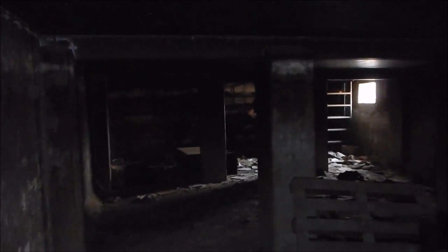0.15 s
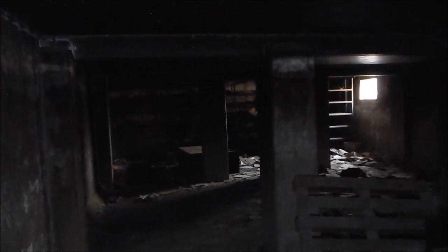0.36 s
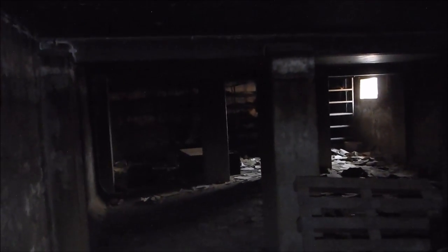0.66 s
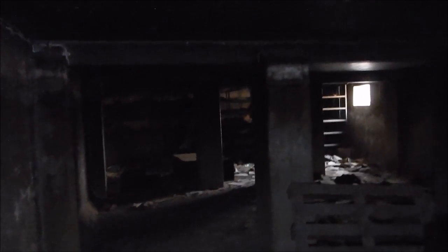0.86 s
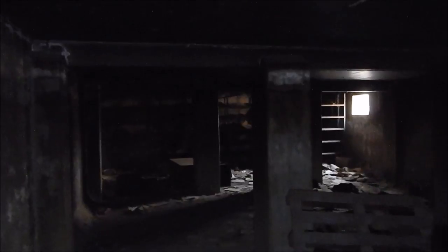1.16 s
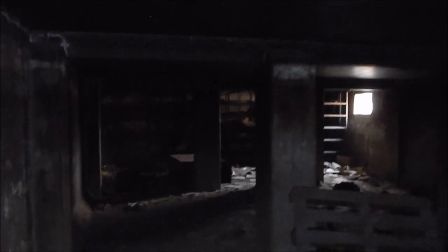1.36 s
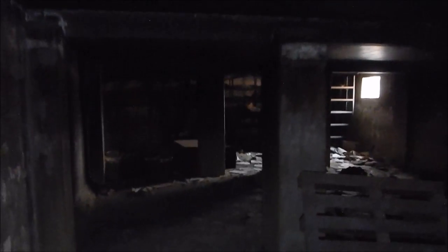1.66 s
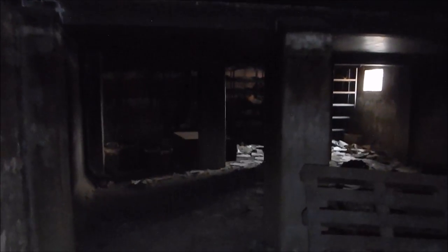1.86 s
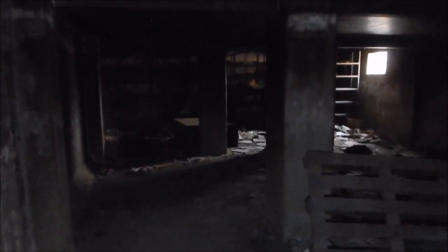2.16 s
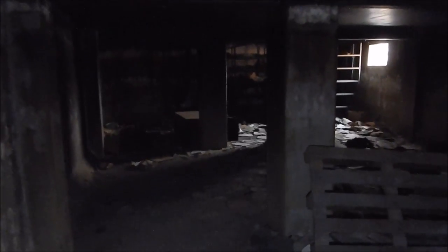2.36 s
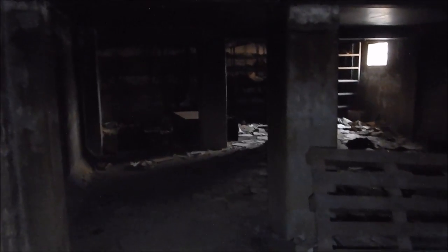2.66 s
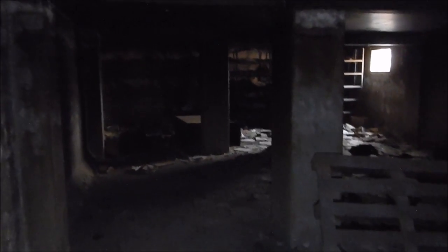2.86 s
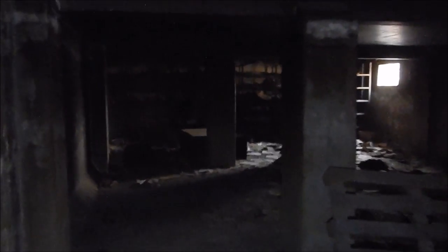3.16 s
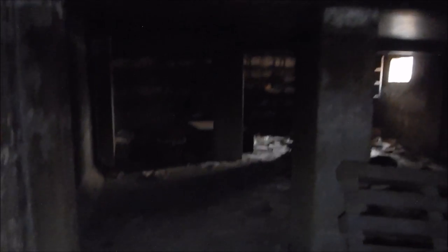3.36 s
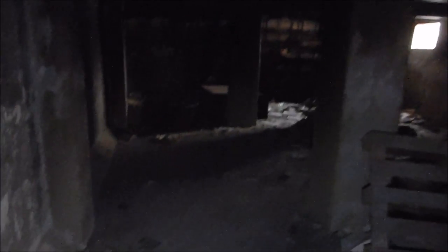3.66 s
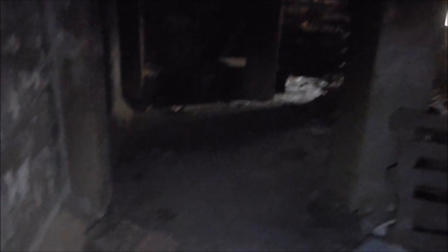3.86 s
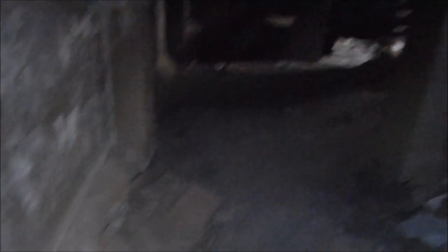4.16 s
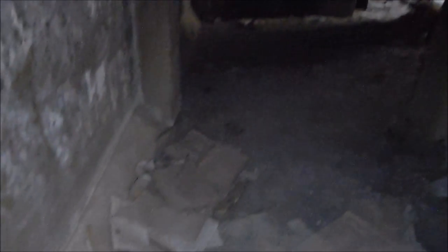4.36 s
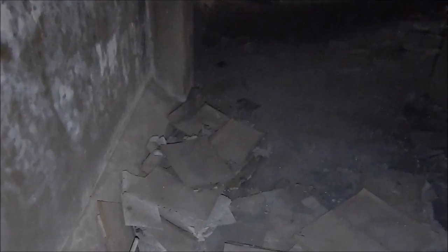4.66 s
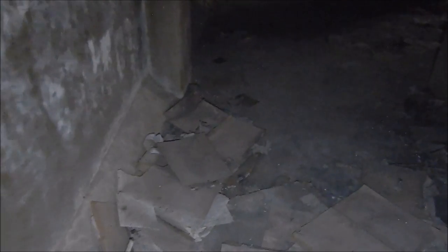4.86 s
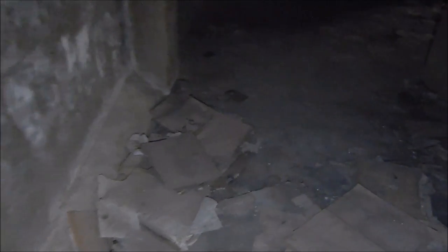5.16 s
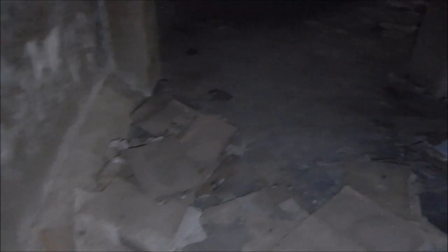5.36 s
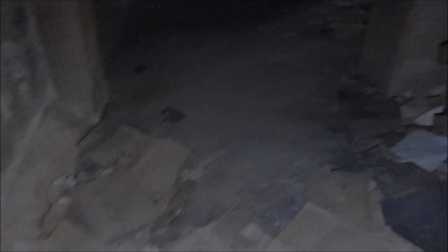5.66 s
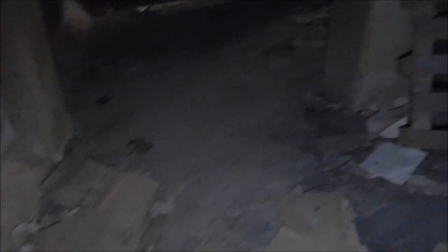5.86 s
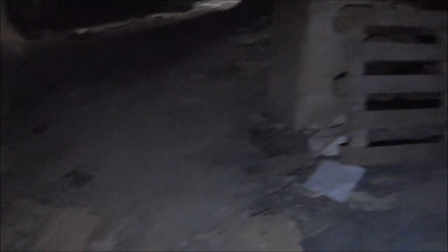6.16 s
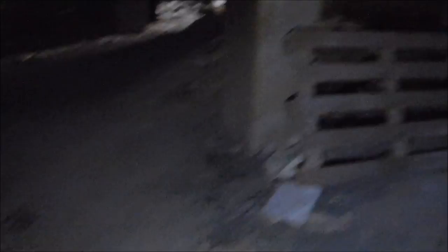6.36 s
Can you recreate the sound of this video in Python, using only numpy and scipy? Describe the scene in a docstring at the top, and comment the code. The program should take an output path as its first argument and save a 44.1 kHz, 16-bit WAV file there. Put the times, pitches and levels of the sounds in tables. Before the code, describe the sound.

In an empty concrete building, close to a hand-held microphone, a loose board slaps the floor loudly, a second hard clack follows a second later with dense crunching of rubble. The shuffling then thins to faint grit and ticks. Around four seconds a piece of metal chatters briefly on concrete; after a quiet stretch, a dull step thuds on boards. Short hard-walled reverberation and faint hiss surround everything.

```python
"""Slow steps over rubble and loose boards in an empty concrete building, close to a hand-held camera.
Soles crush random grains that excite hollow floor, stones and grit; trodden boards and shards resonate.
Dense grain clusters make sharp knocks and ticks, decaying sines a slapped board and clinking metal.
The bare rooms answer with a decaying noise tail of about 0.7 s, longer in the bass, over faint hiss."""
import sys
import numpy as np
from scipy import signal
from scipy.fft import rfft, irfft
from scipy.io import wavfile

SR = 44100
rng = np.random.default_rng(int(sys.argv[2]) if len(sys.argv) > 2 else 0)


def bounce(signal):
    """Save signal as a 16-bit WAV file at the path given by the first command-line argument."""
    frames = np.transpose(np.atleast_2d(signal))
    limited = np.clip(frames, -1, 1)
    pcm = np.round(limited * 32767).astype(np.int16)
    wavfile.write(sys.argv[1], SR, pcm)


N = 286650
TIME = np.arange(N) / SR


def steps():
    """A sole crushes many grains as it settles; the duller the step, the more weight it carries."""
    # soles and heels settling: peak_s, relative level_db, brightness_db, decay_s
    settlings = [(0.421, -29, -5.5, 0.087), (0.689, -34, 0.5, 0.01), (1.094, -36.5, -5.5, 0.058),
                 (1.474, -23, -14, 0.0055), (1.546, -29.5, -4, 0.021), (1.703, -32, -16, 0.014),
                 (2.872, -50.5, -21, 0.0047), (4.937, -44.5, -0.5, 0.02), (5.733, -32, -14, 0.0088),
                 (5.761, -32, -25, 0.0053)]
    rise_s = 0.0053
    rows = []
    for s, db, bright_db, decay in settlings:
        bass_db = -2 - 0.37 * bright_db
        rows.append((s, db, bass_db, bright_db, rise_s, decay))
    return amp(3) * blows(rows, grains(2200, 4.1))


def crunch():
    """Grains keep breaking as the weight shifts, most in the middle of each shuffle."""
    # soles grinding over rubble: peak_s, level_db, bass_db, treble_db, half_length_s
    shuffles = [(.09, -49, -0.5, -11, 0.054), (0.74, -48.5, -3, 1, 0.058), (0.936, -47, -5, -7, 0.058),
                (1.352, -25, -7, -1.5, 0.028), (1.475, -30.5, 4, -5.5, 0.051), (1.616, -31, -6, 0, 0.037),
                (1.707, -29.5, 1.5, -8.5, 0.033), (1.878, -32.5, 1, -7, 0.04), (2.034, -45.5, 1, -5, .11),
                (2.337, -40.5, 2, -1, 0.028), (2.516, -39.5, -11.5, -0.5, 0.045),
                (2.738, -44, -9, -0.5, 0.037), (2.98, -48, -5, -6.5, 0.072), (3.182, -43, -11, -2.5, 0.044),
                (3.319, -46, -6, -14, 0.038), (3.585, -53, -5, -11, 0.084),
                (3.814, -40.5, -6.5, -16, 0.032), (3.982, -35, -8, -4, 0.073),
                (5.24, -38, -4.5, -1.5, 0.012), (5.543, -50, -9, 2.5, 0.076),
                (5.714, -36, -2.5, -1.5, 0.041), (5.993, -50.5, -20, 5, 0.048)]
    # rubble creeping under the standing weight: boards_db, stones_db, grit_db
    creep_db = (-72.5, -64.5, -58)
    swell_shape = 1.38  # 1 = a pointed swell, 2 = a bell
    slip_s, slip_db = .012, 3  # the sole sticks and slips, so the crunch comes in lumps
    power = amp(creep_db)[:, None] ** 2 * np.ones(N)
    for s, db, bass_db, treble_db, half in shuffles:
        distance = abs((TIME - s) / half)
        swell = amp(db) * np.exp(-np.minimum(distance ** swell_shape / 2, 20))
        power += (shares(bass_db, treble_db)[:, None] * swell) ** 2
    weight, stones, grit = np.sqrt(power)

    slips = np.arange(0, N / SR + slip_s, slip_s)
    lumps = evened(level(slips, slip_db * rng.standard_normal(len(slips))))
    coarse = lumps * grains(2500, 3.45)
    fine = lumps * grains(7000, 2.35)
    return rubble(weight * coarse, stones * coarse, grit * evened(fine + 0.67 * coarse))


def thumps():
    """A soft tread booms in the boards' low resonances, a hard one clacks in the higher ones."""
    # resonances of the loose floorboards: pitch_hz, width_hz, relative level_db
    floorboards = [(201, 49.5, 1), (272, 72, -6), (371, 61, -2.5), (657, 143, -6), (1270, 130, -1.5),
                   (1800, 1000, 5)]
    # feet loading those boards: start_s, relative level_db, hardest-driven pitch_hz, decay_s
    treads = [(0.413, -20, 540, 0.0072), (0.428, -26.5, 230, 0.012), (.687, -38.5, 380, 0.0087),
              (0.915, -29, 448, 0.0066), (1.108, -30.5, 480, 0.019), (1.365, -33, 200, 0.025),
              (1.438, -13.5, 750, 0.0081), (1.544, -18, 400, 0.0096), (1.705, -24, 367, 0.034),
              (2.32, -49, 380, 0.043), (3.238, -36, 1800, 0.0059), (5.125, -40.5, 170, 0.021),
              (5.707, -21, 650, 0.0093), (5.711, -24.5, 190, 0.015), (5.76, -31, 546, 0.023),
              (5.872, -41, 170, 0.0073)]
    drive_octaves = 0.69  # how far to either side of that pitch a blow reaches
    source, out = grains(6000, 3.5), np.zeros((2, N))
    for s, db, drive_hz, decay in treads:
        for hz, width, mode_db in floorboards:
            start, ring = note(source, s, hz, width, decay)
            drive = np.exp(-(np.log2(hz / drive_hz) / drive_octaves) ** 2)
            add(out, start, amp(db + mode_db) * drive * ring)
    return amp(0.5) * ports(out)


def shards():
    """Each trodden shard grates briefly at its own pitch; longer notes are purer."""
    # shards underfoot: start_s, relative level_db, pitch_hz, decay_s
    trodden = [(.37, -30, 5700, 0.0064), (0.409, -13.5, 4550, 0.0044), (.412, -29, 8500, .03),
               (1.099, -30, 3390, 0.024), (1.437, -12.5, 3060, 0.0093), (1.556, -29.5, 3490, 0.049),
               (1.629, -24.5, 6040, 0.007), (5.236, -34.5, 910, 0.013), (5.503, -27, 6200, .0018),
               (5.603, -25.5, 6170, 0.0022)]
    source, out = grains(6000, 3.5), np.zeros((2, N))
    for s, db, hz, decay in trodden:
        relative_width = min(0.16 * (0.015 / decay) ** 0.47, 1)  # 0.16 of the pitch at 15 ms decay
        start, ring = note(source, s, hz, hz * relative_width, decay)
        add(out, start, amp(db) * ring)
    return amp(-5.5) * ports(out)


def knocks():
    """Hard contacts are dense grain clusters; the sole cushions the start of the longer ones."""
    # boards and stones, before the lag: start_s, relative level_db, bass_db, treble_db, decay_s
    contacts = [(0.407, -4, -4.5, -3, 0.0027), (.912, -21.5, -18.5, -12.5, 0.0048),
                (1.434, -15.5, -35, -16.5, 0.011), (1.697, -34, -13, -11, 0.0074),
                (3.096, -31.5, -4.5, -7, 0.0081), (3.239, -31, 4, -13, 0.015),
                (5.697, -26.5, -12, -29, 0.016)]
    hard_rise_s, soft_rise_s, lag_s = 0.00021, 0.002, 0.005
    rows = []
    for s, db, bass_db, treble_db, decay in contacts:
        rise = np.interp(decay, [.006, .012], [hard_rise_s, soft_rise_s])
        rows.append((s + lag_s, db, bass_db, treble_db, rise, decay))
    return amp(-2.5) * blows(rows, grains(12000, 3.5))


def ticks():
    """Small stones break in a few milliseconds."""
    # stones snapping, before the lag: start_s, relative level_db, brightness_db
    snaps = [(.303, -33, -9), (.795, -32, 0), (1, -33, 1), (1.06, -29.5, -2), (2.006, -31, 4),
             (2.27, -32, -23), (3.045, -27.5, 1), (3.185, -33, -3), (3.476, -32, -19), (3.612, -28, -1),
             (3.665, -27, -1), (3.849, -30, -16), (3.882, -28.5, -20), (4.813, -34, -2), (4.831, -30.5, -5),
             (5.041, -32.5, -7.5)]
    rise_s, decay_s, lag_s, bass_db = 0.00036, 0.0061, 0.0026, -10
    rows = [(s + lag_s, db, bass_db, bright_db, rise_s, decay_s) for s, db, bright_db in snaps]
    return amp(-7.5) * blows(rows, grains(12000, 1.7))


def board():
    """A loose board slaps the floor; it and the debris on it ring as decaying sines."""
    # the slapped board and its debris: pitch_hz, level_db, t60_s
    board_modes = [(82.5, -27.5, 0.65), (389, -19, 0.025), (478, -10.5, 0.03), (660, -6, 0.026),
                   (1202, -3, 0.02), (1400, -7, 0.0091), (2108, -26.5, .18), (5216, -22.5, 0.15),
                   (5545, -30, 0.2)]
    t = np.maximum(TIME - .4083, 0)  # seconds since the slap
    ring = np.zeros(N)
    for k, (hz, db, t60) in enumerate(board_modes):
        sign = (-1) ** k
        ring += sign * amp(db - 60 * np.minimum(t / t60, 3)) * np.sin(2 * np.pi * hz * t)
    return np.array([ring, ring])


def clink():
    """Metal chatters over concrete; every contact renews its short ring."""
    # the piece of metal, damped by the floor: pitch_hz, relative level_db
    metal_modes = [(1610, -24), (1750, -22), (1957, -14), (2058, -2), (2090, -9), (2342, -6), (2763, -5),
                   (2836, -1), (3060, -18), (3250, -13), (4400, -17), (4877, -17), (5080, -13), (5168, -14),
                   (5290, -18), (5541, -12), (5604, -14), (5652, -12), (5812, -14), (5899, -13),
                   (6110, -20), (6175, -21)]
    # its rattle: time_s, force_db, shift_db from the low to the high modes
    rattle = [(3.944, -37, -4), (3.958, -19, -16), (3.97, 1, -5), (3.986, 0.5, -4), (3.999, -6, 7.5),
              (4.012, -7, 0), (4.024, -42, -8), (4.06, -9, 1), (4.075, -35, -7)]
    # colour of the scrape: frequency_hz, density_db per Hz
    scrape_colour = [(30, -36), (120, -14), (200, 10.5), (700, -22), (1400, -12), (2200, 13), (3000, 3),
                     (3800, -14), (4500, 17.5), (5800, 16), (6500, 8), (8300, 4), (10500, -12),
                     (16000, -17)]
    t60_s, onset_s = 0.14, 0.00033
    times, force_db, shift_db = np.transpose(rattle)
    chatter = grains(4000, 3) * level(times, force_db)
    first, t = round(times[0] * SR), TIME[:SR // 2]
    contacts = chatter[:, first:first + len(t)]
    shift = np.interp(times[0] + t, times, shift_db)
    ring = np.zeros((2, N))
    for hz, db in metal_modes:
        mode = amp(-60 * t / t60_s) * (1 - np.exp(-t / onset_s)) * np.sin(2 * np.pi * hz * t)
        tilt = np.clip(3 * np.log2(hz / 2500), -1, 1)  # -1 for low modes, 1 for high ones
        voice = signal.fftconvolve(contacts * amp(shift * tilt), mode[None], axes=1)
        size = amp(db) * np.linalg.norm(contacts[0])
        add(ring, times[0], size * voice / np.linalg.norm(voice, axis=1, keepdims=True))
    pan = amp([[-0.75], [0.75]])  # slightly to the second microphone
    scrape = ports(colour(chatter, scrape_colour))
    return amp(-14) * ports(ring) * pan + amp(-18.5) * scrape


def room(x):
    """Near walls answer quickly; the halls beyond hold a longer tail."""
    # the longer tail: frequency_hz, t60_s
    hall_t60 = [(80, 4), (200, 0.93), (600, 0.69), (2000, 0.7), (5500, 0.73), (8500, 0.65), (14000, 0.4)]
    near_db, near_t60_s, build_s = 5, 0.28, 0.012
    hz, t, z = signal.stft(rng.standard_normal((2, SR * 3 // 2)), SR, nperseg=256)
    halls = amp(-60 * t / read(hall_t60, hz)[:, None])
    walls = 1 + amp(near_db - 60 * t / near_t60_s)
    build_up = 1 - np.exp(-(t / build_s) ** 2)
    tail = ports(signal.istft(z * halls * walls * build_up, SR, nperseg=256)[1])
    return signal.fftconvolve(x, tail / np.linalg.norm(tail[0]), axes=1)[:, :N]


def hiss():
    """Still air and the microphones' own noise: steady coloured noise."""
    # colour of the noise: frequency_hz, density_db per Hz
    hiss_colour = [(20, -17), (48, 1.5), (85, 4), (130, -7.5), (220, -2), (450, -9.5), (800, -10.5),
                   (1900, -10.5), (2700, -12.5), (3200, -10.5), (4000, -17.5), (5800, -11), (6600, -15),
                   (8300, -19), (10000, -28.5), (15500, -28.5)]
    # its difference between the microphones: frequency_hz, side_db against mid
    hiss_width = [(60, -9.5), (130, -5.5), (290, -4.5), (640, -4), (1410, -3.5), (3100, -1), (6820, 1),
                  (15000, 0.5)]
    return amp(-53) * ports(colour(rng.standard_normal((2, N)), hiss_colour), hiss_width)


def blows(rows, source):
    """Each blow shares its energy between floor, stones and grit."""
    forces = np.zeros((3, 2, N))
    for s, db, bass_db, treble_db, rise, decay in rows:
        start, cluster = burst(source, s, rise, decay)
        add(forces, start, amp(db) * shares(bass_db, treble_db)[:, None, None] * cluster)
    return rubble(*forces)


def shares(bass_db, treble_db):
    """How a force divides between floor, stones and grit, at unit total energy."""
    share = amp([bass_db, -4, treble_db])
    return share / np.linalg.norm(share)


def rubble(weight, stones, grit):
    """Forces excite the hollow floor, the coarse stones and the fine grit."""
    # colour of the hollow floor: frequency_hz, density_db per Hz
    floor_colour = [(30, -39), (70, -16), (100, -3.5), (135, -10), (195, 1), (280, -2), (390, 0.5),
                    (520, -3), (900, -13.5), (3000, -99)]
    # colour of the coarse stones: frequency_hz, density_db per Hz
    stone_colour = [(30, -74), (150, -39.5), (380, 5), (600, 2.5), (900, -0.5), (1300, 2), (1700, 0),
                    (2100, 0), (2800, -14), (5000, -60)]
    # colour of the fine grit: frequency_hz, density_db per Hz
    grit_colour = [(1000, -41.5), (2300, -10.5), (3150, 0.5), (3900, -6), (4600, -1), (5800, 2.5),
                   (6600, -10), (8300, -12.5), (9500, -21), (11500, -27), (16000, -40)]
    return ports(colour(weight, floor_colour) + colour(stones, stone_colour) + colour(grit, grit_colour))


def grains(per_s, spread_db):
    """Tiny fractures at random moments, a few of them large, scaled to rms 1."""
    happens = rng.random(N) < per_s / SR
    size = amp(spread_db * np.minimum(rng.exponential(1, N), 4)) * happens
    return evened(size * rng.choice([-1., 1.], (2, N)))


def burst(source, s, rise, decay, size=22050):
    """A cluster of grains that swells to about rms 1 at time s and dies away: (start s, sound)."""
    first = max(round(s * SR) - size // 4, 0)
    t = TIME[first:first + size] - s
    shape = np.exp(-np.maximum(-t / max(rise, 1e-4), t / max(decay, 1e-4)).clip(max=40))
    cluster = source[:, first:first + size] * shape
    energy = np.linalg.norm(cluster, axis=1, keepdims=True) + 1e-12
    return first / SR, cluster * np.linalg.norm(shape) / energy


def note(source, s, hz, width, decay):
    """A cluster of grains rings one broad resonance: (start s, sound)."""
    build_up = np.sqrt(2) / (np.pi * width)  # a narrow resonance takes longer to swell
    start, cluster = burst(source, s - build_up, min(0.0058, decay / 2), decay)
    band = signal.butter(2, [hz - width / 2, hz + width / 2], "bandpass", fs=SR)
    ring = signal.lfilter(*band, cluster)
    return start, ring * np.linalg.norm(cluster[0]) / np.linalg.norm(ring, axis=1, keepdims=True)


def ports(pair, width=None):
    """Two unrelated signals become two close microphones: alike in the bass, less so in the treble."""
    # usual difference between the microphones: frequency_hz, side_db against mid
    usual_width = [(30, -21), (70, -17), (250, -38), (500, -26), (1000, -21), (2000, -16), (4000, -7.5),
                   (8000, -3), (12000, 6.5)]
    size = pair.shape[1]
    mid, side = rfft(pair)
    spread = amp(read(width or usual_width, np.fft.rfftfreq(size, 1 / SR)))
    return irfft(np.array([mid + spread * side, mid - spread * side]) / np.hypot(1, spread), size)


def colour(x, points, size=2048):
    """Causal minimum-phase filter of unit energy with the given spectrum."""
    log_gain = np.log(amp(read(points, abs(np.fft.fftfreq(size, 1 / SR)))))
    taps = np.fft.ifft(np.exp(np.conj(signal.hilbert(log_gain)))).real
    return signal.oaconvolve(x, taps[None] / np.linalg.norm(taps), axes=1)[:, :N]


def level(times, db):
    """A level curve as gain, fading out beyond its ends."""
    outside = np.maximum(np.maximum(times[0] - TIME, TIME - times[-1]), 0)
    return amp(np.interp(TIME, times, db)) * np.exp(-outside / 0.006)


def read(points, hz):
    """Joins (Hz, value) points on a log-frequency axis."""
    f, value = np.transpose(points)
    return np.interp(np.log(hz + 1), np.log(f + 1), value)


def amp(db):
    """Decibels to gain."""
    return 10 ** (np.asarray(db) / 20)


def evened(x):
    """Scales to rms 1."""
    return x / np.sqrt(np.mean(x ** 2) + 1e-20)


def add(mix, s, sound):
    """Mixes a sound in at time s."""
    part = mix[..., max(round(s * SR), 0):][..., :sound.shape[-1]]
    part += sound[..., :part.shape[-1]]


def scene():
    """Everything underfoot sounds directly and through the room, over the hiss."""
    layers = [  # sound, level sent to the room in dB
        (steps(), -11.5),
        (crunch(), -7.5),
        (thumps() + shards(), -9.5),
        (knocks(), -5),
        (ticks(), -4),
        (board(), -14),
        (clink(), -10.5),
    ]
    direct = sum(sound for sound, _ in layers)
    sent = sum(amp(send_db) * sound for sound, send_db in layers)
    return direct + room(sent) + hiss()


def record(dry):
    """The camera's notches, its full-scale limit and its band edge."""
    # narrow dips in the camera's response: frequency_hz, width_hz
    notches = [(2500, 280), (5000, 187), (7000, 78), (8000, 13)]
    for hz, width in notches:
        dry = signal.lfilter(*signal.iirnotch(hz, hz / width, SR), dry)
    band_edge = signal.firwin(511, 15850, window=("kaiser", 9), fs=SR)  # low-pass, Hz
    return signal.oaconvolve(np.clip(dry, -1, 1), band_edge[None], "same")


dry = scene()
out = record(dry)
bounce(out)
```